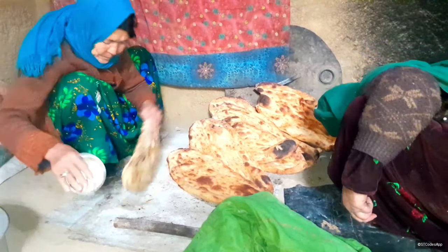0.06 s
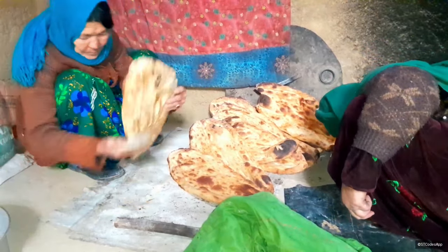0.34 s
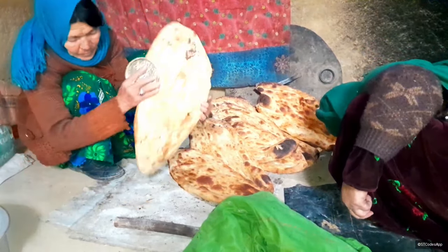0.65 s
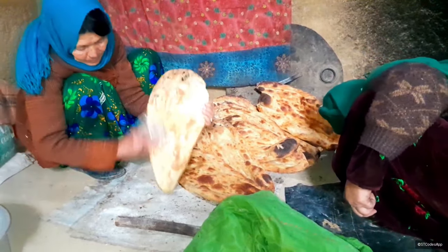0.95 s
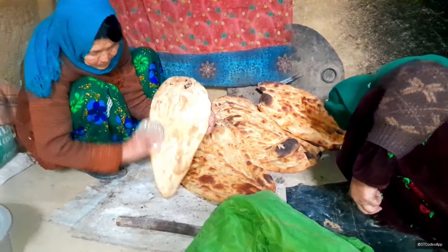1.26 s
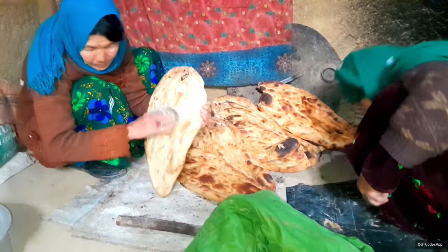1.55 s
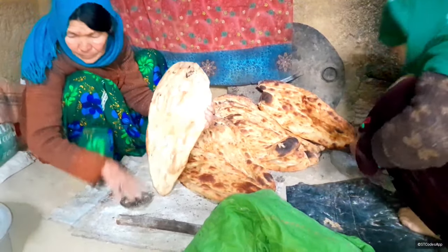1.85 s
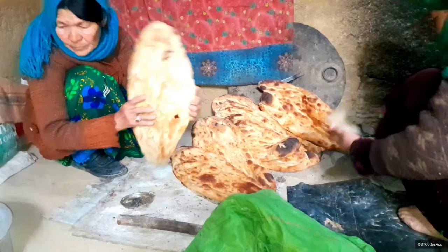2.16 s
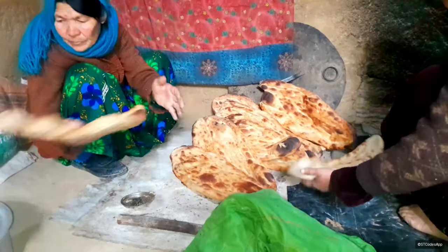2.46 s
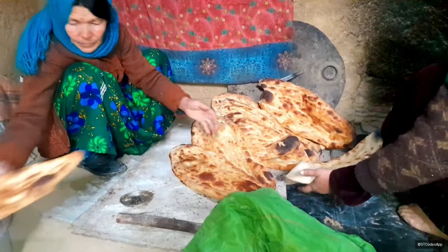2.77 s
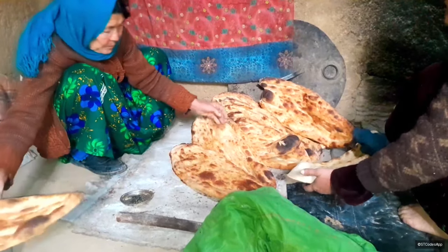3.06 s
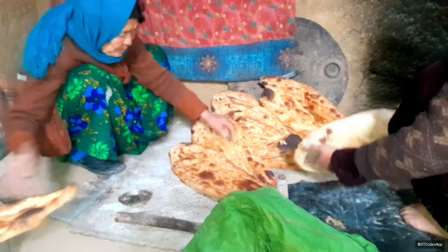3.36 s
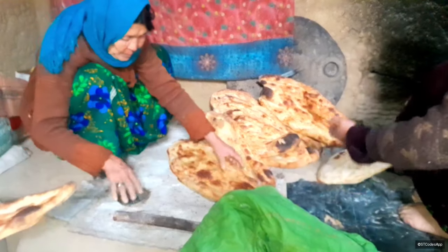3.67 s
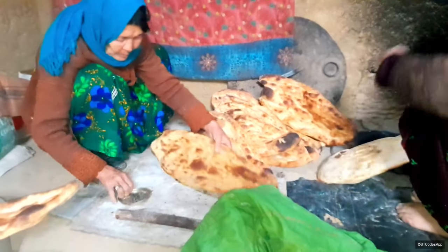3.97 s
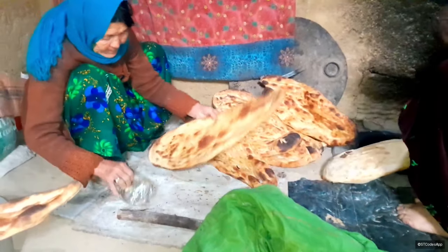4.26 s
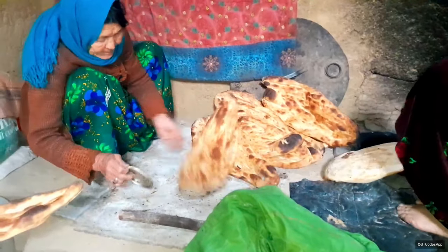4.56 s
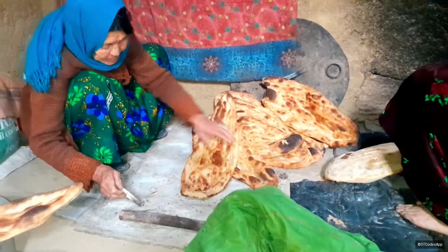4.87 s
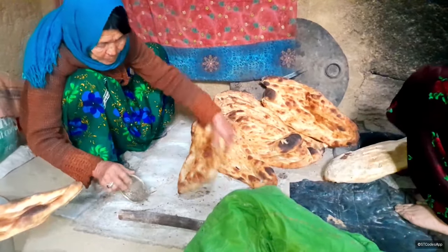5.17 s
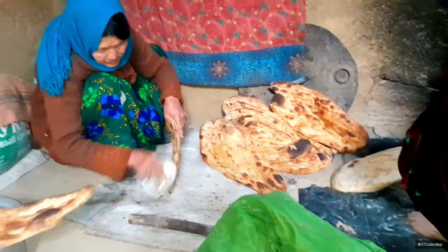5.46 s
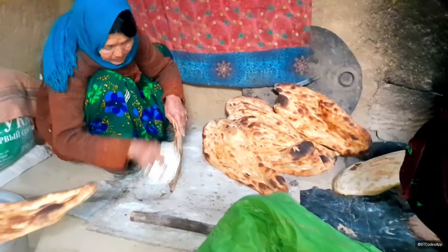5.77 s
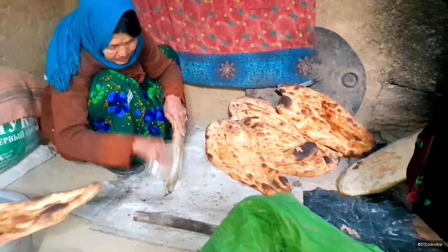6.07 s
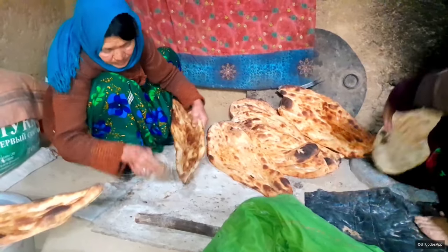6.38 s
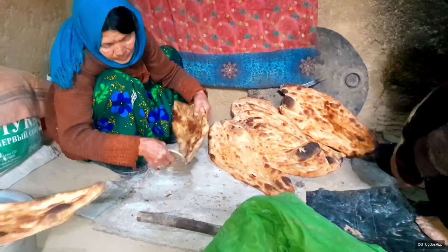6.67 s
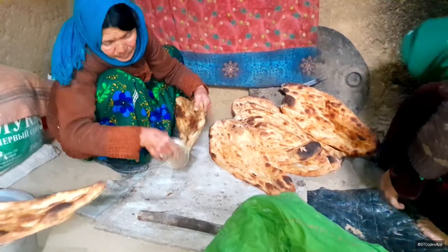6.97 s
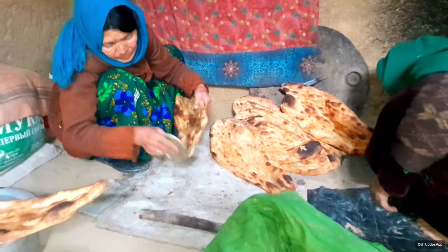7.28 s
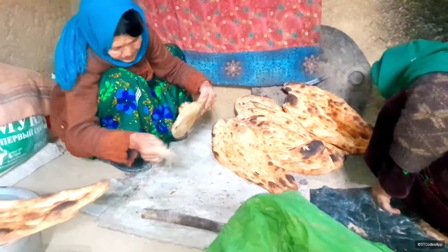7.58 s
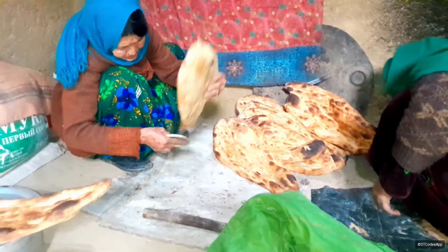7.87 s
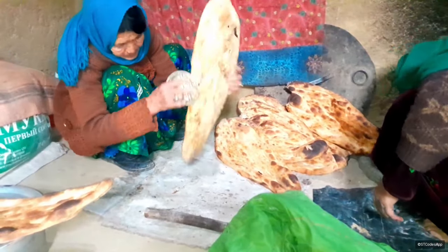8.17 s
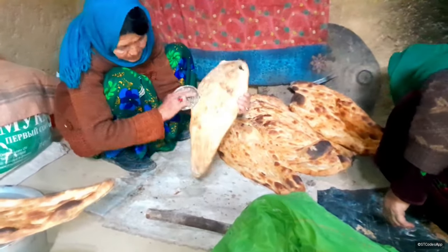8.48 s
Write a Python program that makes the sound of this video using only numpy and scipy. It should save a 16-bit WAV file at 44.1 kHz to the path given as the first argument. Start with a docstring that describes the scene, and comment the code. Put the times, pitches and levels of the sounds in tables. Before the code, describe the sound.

Flatbreads rustle softly on a cloth-covered floor in a small, dead room. A tin lid ticks, then scrapes the hard crust in three gritty sweeps. Loaves are slid and dropped on a pile with dull thuds and crackles, and one is dragged on its edge. Quick, crisp chops of the rim follow, then a flurry of ticks and the start of another scrape, all heard close by.

```python
"""First comes a soft rustle of flatbreads being handled on a cloth-covered floor, in a small dead room.
A small tin lid ticks, then cleans the crust in three long sweeps: tiny fractures hiss, ring the lid and
drum on the loaf. Loaves are lifted, slid and dropped on the pile with dull thuds and crackles.
One is dragged down on its edge, stuttering over the cloth; then come quick chops of the rim,
a flurry of ticks and the start of one more sweep."""
import sys
import numpy as np
from scipy import signal
from scipy.fft import rfft, irfft, next_fast_len
from scipy.io import wavfile
from scipy.ndimage import uniform_filter1d

SR = 44100
rng = np.random.default_rng(int(sys.argv[2]) if len(sys.argv) > 2 else 0)


def transcribe(u):
    """Save the signal u as a 16-bit wav file named by the first command-line argument.

    u: samples, shape (n,) or (channels, n), limited to [-1, 1]; the rate is SR.
    q: integer samples, one column per channel.
    """
    v = np.clip(np.atleast_2d(u).T, -1, 1)
    q = np.round(v * 32767).astype(np.int16)
    wavfile.write(sys.argv[1], SR, q)


N = 380583
TIME = np.arange(N) / SR


def from_db(db):
    """Decibels to gain."""
    return 10 ** (np.asarray(db) / 20)


def unit_energy(response):
    """Scale an impulse response so that it keeps the power of white noise."""
    return response / np.sqrt(np.sum(response ** 2) + 1e-20)


def at_hz(points, hz):
    """Read a curve on a log-frequency axis."""
    f, value = np.transpose(points)
    return np.interp(np.log(np.maximum(hz, 1)), np.log(f), value)


def add(out, start, sound):
    """Mix a short sound in at a time."""
    first = np.searchsorted(TIME, start)
    out[first:first + len(sound)] += sound[:N - first]


def through(force, response):
    """Pass a force through an impulse response."""
    return signal.oaconvolve(force, response)[:N]


def body(colour, low_hz=10, high_hz=20000, size=4096):
    """Minimum-phase impulse response of an EQ curve between a low cut and a high cut."""
    hz = np.maximum(np.fft.rfftfreq(size, 1 / SR), 1)
    cuts = np.sqrt((1 + (low_hz / hz) ** 8) * (1 + (hz / high_hz) ** 8))
    cepstrum = irfft(np.log(from_db(at_hz(colour, hz)) / cuts + 1e-6))
    cepstrum[1:size // 2] *= 2
    cepstrum[size // 2 + 1:] = 0
    return unit_energy(irfft(np.exp(rfft(cepstrum))))


def resonance(hz, width_hz, size=4096):
    """Impulse response of one ringing mode, which radiates nothing at low frequencies."""
    t = TIME[:size]
    ring = np.exp(-np.pi * width_hz * t) * np.sin(2 * np.pi * hz * t)
    return unit_energy(np.diff(ring, prepend=0))


def grains(per_s, spread_db, judder_db, judder_hz, size=N):
    """Crust breaks in tiny uneven fractures, bunched as the contact catches and slips; unit power."""
    sizes = from_db(spread_db * np.minimum(rng.exponential(1, size), 4)) * rng.choice([-1, 1], size)
    catches = np.interp(TIME[:size] * judder_hz, np.arange(size), rng.standard_normal(size))
    fractures = (rng.random(size) < per_s / SR) * sizes * from_db(judder_db * catches)
    return fractures / np.sqrt(np.mean(fractures ** 2) + 1e-20)


def slide_gain(start, length, swell_db, level_db, firm_db=-38.5, firm_attack_s=.007, fall_db_per_s=331):
    """Envelope of a slide: it catches (faster when firm), swells or sags, and runs out."""
    t = TIME - start
    attack = firm_attack_s * np.sqrt(from_db(firm_db - level_db))
    db = swell_db * (np.clip(t / length, 0, 1) - .5) - fall_db_per_s * np.maximum(t - length, 0)
    return np.clip(t / attack, 0, 1) * from_db(np.maximum(db, -200))


def arm_gain(start, rise, swell_db, ease, fall_db_per_s, bend, touch_s=.003):
    """Envelope of an arm movement: touch, speed up, ease over, slow down; bend 1 climbs straight in dB."""
    t = TIME - start
    climb_db = swell_db * np.clip(1 - t / rise, 0, 1) ** bend
    slowing_db = fall_db_per_s * (np.hypot(np.maximum(t - rise, 0), ease) - ease)
    return np.clip(t / touch_s, 0, 1) * from_db(-climb_db - slowing_db)


def pan_track(events):
    """Pan in dB, left over right: each event's last column holds until the next event begins."""
    rows = np.array(events)
    latest = np.maximum(np.searchsorted(rows[:, 0], TIME, side="right") - 1, 0)
    return uniform_filter1d(rows[latest, -1], size=200)


def shade(stereo, pan_curve):
    """Pan by frequency, as the loaf and the hands shade each side differently."""
    size = next_fast_len(N + 1024)
    side_db = at_hz(pan_curve, np.fft.rfftfreq(size, 1 / SR)) * np.array([[.5], [-.5]])
    return irfft(rfft(stereo, size) * from_db(side_db), size)[:, :N]


# Short decay of the dead room: f/Hz, t60/s
ROOM_DECAY = [(100, 0.31), (700, 0.21), (4000, 0.2), (13000, .16)]
# How alike the reverb is left and right: f/Hz, correlation/0-1
ROOM_CORRELATION = [(100, 0.71), (350, 0.96), (900, .25), (2500, 0.65), (12000, .02)]
def room(size=16384, onset_s=0.0013):
    """Stereo response of the room: dense reflections die band by band, most nearly mono in the bass."""
    t, hz, out = TIME[:size], np.fft.rfftfreq(size, 1 / SR), 0
    mid, side = np.exp(2j * np.pi * rng.random((2, len(hz))))
    alike = np.clip(at_hz(ROOM_CORRELATION, hz), 0, 1)
    field = np.sqrt(1 + alike) * mid + np.sqrt(1 - alike) * side * [[1], [-1]]
    edges = np.geomspace(20, SR / 2, 13)
    for low, high in zip(edges, edges[1:]):
        decay = from_db(-60 * t / at_hz(ROOM_DECAY, np.sqrt(low * high)))
        band = irfft(field * ((hz >= low) & (hz < high))) * decay * np.clip(t / onset_s, 0, 1)
        out = out + unit_energy(band) * np.sqrt(4 * (high - low) / SR)
    return out


def place(x, pan_db, lag_ms, wet_db, patterns=3):
    """Direct sound, later on the right, plus reflections that shift as hands and loaves move."""
    direct = np.array([x, np.interp(TIME - lag_ms / 1000, TIME, x)])
    knots = np.arange(0, TIME[-1] + 1, .09)
    sends = np.array([np.interp(TIME, knots, rng.standard_normal(len(knots))) for _ in range(patterns)])
    sends /= np.sqrt(np.sum(sends ** 2, axis=0))
    echoes = sum(signal.oaconvolve([x * send], room(), axes=1)[:, :N] for send in sends)
    wet, sides = from_db(wet_db), from_db(np.array([[.5], [-.5]]) * pan_db)
    return sides * (direct + wet * echoes) / np.sqrt(1 + wet ** 2)


# Warm rustle of sliding bread: f/Hz, level/dB
SLIDE_EQ = [(18, -39), (30, -12), (124, -0.5), (174, -1), (245, -1.5), (486, -10), (702, -8.5),
            (1320, -14.5), (1960, -14), (2290, -13.5), (3770, -16.5), (7270, -26), (9220, -33.5),
            (14800, -19.5), (16000, -27.5)]
# Its stereo spread: f/Hz, pan/dB
SLIDE_SHADE = [(100, -8), (500, -7.5), (1500, -3.5), (4000, -3.5), (6200, 14), (9000, 9.5), (13000, -10.1)]
# Loaves handled: t/s, length/s, crumbs/dB, rub/dB, weight/dB, swell/dB, hollow/Hz, pan/dB
SLIDES = [ (0.0, 0.017, -36.5, -36, -41.5, -18, 1200, 3), (0.04, 0.51, -78.5, -81, -83, -34, 766, 6.5),
          (0.416, 0.12, -47, -53.5, -64, -6.5, 1200, 6.5),
          (0.578, 0.19, -51.5, -53.5, -63, -15.5, 630, 7.5), (0.777, 0.21, -52, -48, -50, 11.5, 1300, 6.5),
          (2.02, 0.16, -60, -54.5, -60, 14, 1200, 8), (2.202, 0.21, -58.5, -49.5, -60, -2, 1200, 8),
          (2.446, 0.03, -55, -52.5, -49, 19, 420, 5), (2.931, 0.09, -44.5, -39.5, -36, -8.5, 720, 5.5),
          (3.021, 0.081, -50, -35.5, -33.5, 0, 696, 6), (3.153, 0.16, -52, -45, -50, -3.5, 700, 7),
          (3.376, 0.13, -58, -54.5, -63, -28, 1130, 2.5), (3.581, 0.17, -49.5, -51, -45, -20.5, 410, 6.5),
          (3.798, 0.13, -56.5, -62, -62.5, 2.5, 1360, 10), (3.97, 0.26, -48, -61, -66, -6.5, 1410, 7.5),
          (4.426, 0.16, -59, -67, -66, 17, 1400, 7.5), (4.575, 0.087, -47, -37.5, -53, -12.5, 1300, 6),
          (4.673, 0.041, -43, -39, -31, -1, 830, 6), (4.77, 0.33, -62.5, -71, -64, -1, 913, 6),
          (5.054, 0.153, -49.5, -46, -55, 1.5, 790, 5.5), (5.197, 0.085, -47.5, -42.5, -49.5, 1, 1300, 4),
          (5.326, 0.2, -51.5, -53.5, -63, 5.5, 1460, 6.5), (6.074, 0.27, -47.5, -62, -58.5, 6.5, 670, 0),
          (6.307, 0.02, -46, -31, -35.5, -7, 428, 4.5), (6.451, 0.22, -67.5, -81, -83, -27, 534, -2.5)]
def loaf_slides(crumb_db=1, rub_db=-1, weight_db=-1, hollow_db=-6, hollow_width_hz=170):
    """Loaves slide on hands and each other: crumbs rustle, the rub rings the hollow below, bread flexes."""
    crumbs = grains(per_s=1900, spread_db=3.5, judder_db=4.0, judder_hz=89.5)
    rub = grains(per_s=3000, spread_db=3.0, judder_db=3, judder_hz=67.73)
    loose, rubbing, weight, hollow = np.zeros((4, N))
    for start, length, loose_db, rubbing_db, heavy_db, swell_db, hollow_hz, _ in SLIDES:
        gain = slide_gain(start, length, swell_db, rubbing_db)
        loose += from_db(loose_db) * gain
        rubbing += from_db(rubbing_db) * gain
        weight += from_db(heavy_db) * gain
        force = (rub * gain)[(TIME >= start) & (TIME < start + .5)]
        add(hollow, start, from_db(rubbing_db) * through(force, resonance(hollow_hz, hollow_width_hz)))
    sound = from_db(crumb_db) * through(crumbs * loose, body(SLIDE_EQ, low_hz=1470))
    sound += from_db(hollow_db) * hollow
    sound += from_db(rub_db) * through(rub * rubbing, body(SLIDE_EQ, low_hz=330, high_hz=1560))
    sound += from_db(weight_db) * through(rub * weight, body(SLIDE_EQ, high_hz=350))
    return shade(place(sound, pan_track(SLIDES), lag_ms=0.14, wet_db=0), SLIDE_SHADE)


# Bed of quiet air: f/Hz, level/dB
AIR_EQ = [(15, -28), (25, -21.5), (175, -5.5), (1290, -13), (2000, -16.5), (5000, -16), (6560, -14),
          (7920, -17), (9320, -15), (16000, -29)]
def room_tone(air_db=-75, rumble_db=-82):
    """Faint steady air of the room over a distant low rumble."""
    air = from_db(air_db) * through(rng.standard_normal(N), body(AIR_EQ))
    rumble = from_db(rumble_db) * through(rng.standard_normal(N), body(AIR_EQ, high_hz=130))
    return place(air + rumble, pan_db=12, lag_ms=0, wet_db=4.0)


# Bright snap of rim on crust, for ticks and chops: f/Hz, level/dB
RIM_EQ = [(29, -50), (50, -26), (244, -12), (303, -17.5), (385, -14), (1050, -16.5), (2060, 6.5),
          (3180, 6.5), (3850, 10.5), (7370, 6.5), (8710, -11.5), (11600, -0.5), (15500, 3)]
# Light touches of the lid: t/s, level/dB, ring/Hz, pan/dB
TICKS = [(0.8904, -33, 3620, 8), (3.997, -29.5, 1980, 12), (4.412, -38, 3410, 7), (4.8294, -38.5, 3040, 28),
         (6.627, -36, 3180, -18), (7.655, -37, 2970, -7), (8.06, -18, 2210, -5), (8.0797, -27.5, 3850, -3),
         (8.1572, -29, 2570, -1), (8.19, -22, 3960, -8), (8.2914, -35, 2020, -14), (8.302, -25, 2050, 3),
         (8.3557, -21.5, 2000, -2), (8.3683, -23, 3770, 0), (8.4585, -33.5, 1550, 5),
         (8.493, -24, 1620, -3)]
def lid_ticks(trim_db=4, ring_db=-2, ring_width_hz=300, chatter_db=-13, chatter_s=0.0025, size=2048):
    """The lid touches the crust: a snap with a brief chatter; where it touches decides which tone rings."""
    out, t, snap = np.zeros(N), TIME[:size], body(RIM_EQ, low_hz=1414)
    for start, db, hz, _ in TICKS:
        chatter = from_db(chatter_db) * np.exp(-t / chatter_s) * rng.standard_normal(size)
        force = from_db(db + trim_db) * ((t == 0) + chatter)
        add(out, start, through(force, snap))
        add(out, start, from_db(ring_db) * through(force, resonance(hz, ring_width_hz)))
    return place(out, pan_track(TICKS), lag_ms=0.064, wet_db=-4.5)


# Choked modes of the tin lid: f/Hz, width/Hz, level/dB
LID_MODES = [(2130, 300, -14), (2820, 420, -5), (3480, 520, 0), (3950, 480, 0), (6640, 400, -12)]
def gripped_lid(pitch=1):
    """Impulse response of the lid: a few modes, damped and detuned by the grip of the fingers."""
    return unit_energy(sum((-1) ** k * from_db(db) * resonance(hz * pitch, width)
                           for k, (hz, width, db) in enumerate(LID_MODES)))


# Rasp and body of the scraped loaf: f/Hz, level/dB
SWEEP_EQ = [(29, -26), (50, -13), (371, -1), (472, -6.5), (545, 1), (905, -6.5), (2060, 1), (3100, -2),
            (3410, 2.5), (4560, -8), (6870, -10.5), (9870, -19.5), (12300, -9.5), (14900, -8), (16000, -31)]
# Shading by the upright loaf and the hands: f/Hz, pan/dB
SWEEP_SHADE = [(200, 6), (900, 7), (2000, 0.5), (3500, -4), (5500, 9.5), (8000, 17.5), (12000, -5.5)]
# Long scrapes: t/s, rise/s, swell/dB, ease/s, fall/(dB/s), grit/dB, drum/dB, weight/dB, pan/dB
SWEEPS = [ (0.935, 0.13, 21, 0.0047, 602, -16, -25.5, -38, 5),
          (1.306, 0.079, 10, 0.045, 519.5, -17.5, -25.5, -33.5, 3),
          (1.656, 0.069, 22.5, 0.14, 448.5, -16, -25, -30, 3.5),
          (8.536, 0.093, 36.5, .060, 412, -20, -25.5, -52, -9)]
def lid_sweeps(grit_db=2, weight_db=-1, ring_db=-18, bend=1.47, loaf_lag_s=0.024, loaf_follows=0.74):
    """The rim grinds along the crust; the fractures hiss, ring the lid and drum on the loaf."""
    grit, drum, weight = np.zeros((3, N))
    for start, rise, swell_db, ease, fall, crust_db, drum_db, heavy_db, _ in SWEEPS:
        grit += from_db(crust_db) * arm_gain(start, rise, swell_db, ease, fall, bend)
        # the loaf peaks later than the rim and swings less
        follow = arm_gain(start, rise + loaf_lag_s, swell_db, ease, fall, bend) ** loaf_follows
        drum += from_db(drum_db) * follow
        weight += from_db(heavy_db) * follow
    fractures = grains(per_s=12000, spread_db=2.5, judder_db=2.0, judder_hz=217.6)
    bite = fractures * grit
    crust = from_db(grit_db) * through(bite, body(SWEEP_EQ, low_hz=1200))
    ring = from_db(ring_db) * through(bite * rng.standard_normal(N), gripped_lid())
    loaf = through(fractures * drum, body(SWEEP_EQ, low_hz=320, high_hz=1300))
    loaf += from_db(weight_db) * through(fractures * weight, body(SWEEP_EQ, high_hz=300))
    pan_db = pan_track(SWEEPS)
    sound = place(crust + ring, pan_db, lag_ms=0.17, wet_db=-3)
    sound += place(loaf, .35 * pan_db - 7, lag_ms=0.26, wet_db=-8.5)
    return shade(sound, SWEEP_SHADE)


# Flexing modes of a whole loaf: f/Hz, level/dB
LOAF_MODES = [(80, -2), (133, 5), (252, 0), (352, -12)]
# Dull low thud: f/Hz, level/dB
THUD_EQ = [(18, -54.5), (30, -28), (108, -6.5), (140, 0.5), (256, -4), (301, -20), (479, -13.5), (600, -5),
           (780, -49.5), (1320, -120)]
# Dry crunch of crust, for bumps and cracks: f/Hz, level/dB
CRUNCH_EQ = [(180, -21.5), (300, -6), (689, 2), (978, -6.5), (1930, 1), (2320, -3.5), (4160, -13),
             (4750, -22), (6850, -15), (8940, -33.5), (15000, -15.5), (16000, -31.5)]
# Stereo spread of bumps and cracks: f/Hz, pan/dB
CRUNCH_SHADE = [(300, -0.5), (2500, -1.5), (6000, 7.5), (9000, 9.5), (13000, 0)]
# Soft hits on a loaf: t/s, thud/dB, crunch/dB, t60/s, pan/dB
BUMPS = [ (0.938, -57, -43, 0.052, -6), (1.046, -16, -20.5, 0.26, -2), (1.828, -18.5, -32, 0.06, -2),
         (2.061, -45, -53, 0.16, 1), (2.217, -37.5, -44, 0.33, -2), (2.477, -44, -28.5, 0.036, 10.5),
         (2.682, -52.5, -51, 0.18, -1), (2.938, -37, -34, 0.084, 4), (3.024, -46, -18, 0.14, 4),
         (3.056, -31.5, -22.5, 0.16, 1.5), (3.187, -37, -45, 0.36, 0), (3.279, -42, -40, 0.2, 1.5),
         (3.599, -37.5, -28, 0.039, 0), (4.58, -52, -38.5, 0.36, 4), (4.679, -29, -38, 0.13, 2),
         (5.011, -34, -52, 0.026, -19), (5.224, -58, -35, 0.14, 12), (5.7, -32, -12, 0.095, 4),
         (5.719, -28, -24, 0.068, 10), (6.31, -30, -14, 0.056, 6.5)]
def loaf_bumps(attack_s=0.0029, flex_db=-4, rumple_db=-4):
    """A loaf is knocked or lands: it flexes with a dull thud, and crunches as its crust settles."""
    thud, crunch, flex = np.zeros((3, N))
    t = TIME[:SR // 2]
    for start, thud_db, crunch_db, t60, _ in BUMPS:
        settle = np.minimum(t / attack_s, 1) * from_db(-60 * t / t60)
        loaf_size = 1 + .05 * rng.standard_normal()
        modes = sum(from_db(db) * np.sin(2 * np.pi * hz / loaf_size * t) for hz, db in LOAF_MODES)
        add(flex, start, from_db(thud_db + flex_db) * settle * modes)
        add(thud, start, from_db(thud_db + rumple_db) * settle)
        add(crunch, start, from_db(crunch_db) * settle)
    contacts = grains(per_s=5100, spread_db=4, judder_db=5.5, judder_hz=287.5)
    sound = flex + through(contacts * thud, body(THUD_EQ, high_hz=483))
    sound += through(contacts * crunch, body(CRUNCH_EQ, low_hz=360))
    return shade(place(sound, pan_track(BUMPS), lag_ms=0.27, wet_db=-7.0), CRUNCH_SHADE)


# Thin, papery scratch: f/Hz, level/dB
GRAZE_EQ = [(120, -29.5), (200, -16.5), (601, -10), (1250, -12), (1870, -3.5), (2330, -4.5), (3760, 2),
            (6880, -14), (8900, -25.5), (14100, -9), (16000, -14)]
# Light brushes of the lid: t/s, length/s, level/dB, swell/dB, pan/dB
GRAZES = [(1.163, 0.089, -57, -5.5, 4.5), (5.895, .09, -47, -2.5, -8), (6.928, .012, -61, -2.5, -6),
          (7.94, 0.075, -69.5, 2, -19), (8.051, 0.26, -50, -3, -6.5), (8.329, 0.23, -46.5, -14, -7.5)]
def lid_grazes(trim_db=1):
    """The rim brushes cloth and crust with hardly any pressure: a thin, uneven scratching."""
    gain = sum(from_db(db) * slide_gain(start, length, swell_db, db)
               for start, length, db, swell_db, _ in GRAZES)
    scratches = grains(per_s=1200, spread_db=0.5, judder_db=4.5, judder_hz=86.35) * gain
    sound = from_db(trim_db) * through(scratches, body(GRAZE_EQ, low_hz=149))
    return place(sound, pan_track(GRAZES), lag_ms=0.11, wet_db=-10)


# Hard crust snapping under load: t/s, level/dB, pan/dB
CRACKS = [(1.329, -21, 0.5), (1.654, -32, 5.5), (1.676, -21.5, 5), (2.682, -49.5, -3.5), (2.939, -38, 1),
          (3.027, -25.5, -10), (3.279, -32, -1), (3.601, -34, 11), (3.735, -43, 4), (4.683, -27, 8),
          (5.702, -18.5, -3.5), (5.792, -20.5, -22.5), (5.817, -28.5, -24.5), (5.886, -31, -14),
          (6.3085, -16, -5)]
def crust_cracks(length_s=0.0039, release_s=0.00033, size=1024):
    """A blister of crust gives way: a few milliseconds of dense fractures that knock on the loaf."""
    out, crust = np.zeros(N), body(CRUNCH_EQ, low_hz=287)
    force = np.exp(-np.maximum(TIME[:size] - length_s, 0) / release_s)
    for start, db, _ in CRACKS:
        add(out, start, from_db(db) * through(force * rng.choice([-1, 1], size), crust))
    return shade(place(out, pan_track(CRACKS), lag_ms=0.13, wet_db=-6.5), CRUNCH_SHADE)


# Faint tail of the lid ringing on between the fingers: f/Hz, width/Hz, level/dB
LID_TAIL = [(2084, 10, -21.5), (3970, 22, -16)]
# Rim strokes: t/s, rise/s, contact/s, grit/dB, fade/dB, loaf/dB, ring/dB, crispness/dB, pan/dB
CHOPS = [ (4.376, 0.0092, 0.039, -57, 0.5, -64, 1, -4.5, 10.5),
         (5.672, 0.0034, 0.0044, -8, 10.5, -49, -21.5, 4, 22),
         (5.993, 0.0036, 0.016, -7.5, 7, -21, -20.5, 1, -9),
         (6.019, 0.0058, 0.054, -9, 22.5, -24, -11.5, 0.5, -4),
         (6.274, .006, 0.0074, -22, -1, -24, -3, 2, -6.5),
         (6.313, 0.0019, 0.045, -27, 6, -55, -18, 8.5, -9),
         (6.678, 0.0058, 0.042, -7.5, 22.5, -25.5, -6.5, 5, -5.5),
         (6.963, 0.0042, 0.03, -14, 8.5, -30, 0.5, 2.5, -7.5),
         (7.232, 0.0088, 0.023, -11.5, 6.5, -33, -5, 0, -6.5),
         (7.501, 0.005, 0.063, -14, 22.5, -30, -13, -1, -5.5),
         (7.751, 0.012, 0.078, -15.5, 5, -31.5, -22, 1.5, -7)]
def lid_chops(release_s=0.01, loaf_lag_s=0.0089, crisp_above_hz=8000, size=8192):
    """The rim bites at once, skids, and leaves the crust; the loaf answers a moment later."""
    crust, loaf = np.zeros((2, N))
    t, flex = TIME[:size], body(RIM_EQ, low_hz=92.3, high_hz=1140)
    tail = sum(from_db(db) * resonance(hz, width) for hz, width, db in LID_TAIL)
    for start, rise, contact, grit_db, fade_db, loaf_db, ring_db, crisp_db, _ in CHOPS:
        release = np.exp(-np.maximum(t - contact, 0) / release_s)
        force = np.minimum(t / rise, 1) * from_db(-fade_db * t / contact) * release
        fractures = force * grains(per_s=16000, spread_db=7.0, judder_db=4.05, judder_hz=420, size=size)
        crisp_eq = [(hz, db + crisp_db * (hz > crisp_above_hz)) for hz, db in RIM_EQ]
        grit = through(fractures, body(crisp_eq, low_hz=940))
        tin = from_db(ring_db) * gripped_lid(pitch=rng.uniform(.98, 1.04))
        ring = through(force * rng.standard_normal(size), tin + tail)   # the skid shakes the lid itself
        add(crust, start, from_db(grit_db) * (grit + ring))
        add(loaf, start + loaf_lag_s, from_db(loaf_db) * through(fractures, flex))
    sound = place(crust, pan_track(CHOPS), lag_ms=0.0877, wet_db=-7)
    return sound + place(loaf, pan_db=0, lag_ms=.03, wet_db=3.0)


# Stereo spread of the chops: f/Hz, pan/dB
CHOP_SHADE = [(200, -2), (900, 0), (2000, 0.3), (3800, -3.5), (6500, -0.2), (12000, -2.8)]
def shaded_chops():
    """The chops lean slightly to the right in the bass and in parts of the treble."""
    return shade(lid_chops(), CHOP_SHADE)


# Heavy scuff of bread on cloth: f/Hz, level/dB
DRAG_EQ = [(18, -34.5), (30, -14), (93, 2.5), (204, -1.5), (355, 0.5), (449, -8), (554, -8), (913, -11.5),
           (1070, -5), (4080, -4.5), (7470, -22.5), (8980, -25.5), (14800, -22), (16000, -35)]
# Its stereo spread: f/Hz, pan/dB
DRAG_SHADE = [(60, -11), (110, -19), (200, -11), (380, -18.5), (700, -24.5), (1290, -4), (2380, -3),
              (4400, 2.5), (8120, -7.5), (15000, -18)]
# The loaf ends up upright and shadows the left side: t/s, length/s, level/dB
DRAG_SHADOW = (5.755, .04, -10)
# One pull of the arm: t/s, rise/s, swell/dB, ease/s, fall/(dB/s)
DRAG = (5.532, 0.16, 36.2, 0.11, 167)
def loaf_drag(grit_db=-23, loaf_db=-24, fine_db=-32, fine_follows=1.6):
    """A loaf's edge stutters over the cloth, coarse and heavy; fine grit hisses mostly at full speed."""
    speed = arm_gain(*DRAG, bend=1.3)
    slips = grains(per_s=2500, spread_db=5, judder_db=4.5, judder_hz=154.5)
    crust = from_db(grit_db) * through(slips * speed, body(DRAG_EQ, low_hz=1200, high_hz=5440))
    fine = from_db(fine_db) * through(slips * speed ** fine_follows, body(DRAG_EQ, low_hz=5500))
    loaf = from_db(loaf_db) * through(slips * speed, body(DRAG_EQ, high_hz=1240))
    sound = place(crust, pan_db=-8.5, lag_ms=.15, wet_db=1.5)
    sound += place(fine, pan_db=-10, lag_ms=0.16, wet_db=4.5)
    sound += place(loaf, pan_db=-7, lag_ms=0.29, wet_db=-12.5)
    start, length, shadow_db = DRAG_SHADOW
    left_gain = from_db(shadow_db * np.clip((TIME - start) / length, 0, 1))
    return shade(sound, DRAG_SHADE) * [left_gain, np.ones(N)]


def scene():
    """All the work on the bread, over the quiet of the room."""
    return (loaf_slides() + room_tone() + lid_ticks() + lid_sweeps() + loaf_bumps()
            + lid_grazes() + crust_cracks() + shaded_chops() + loaf_drag())


def record(dry, dip_hz=9000, dip_width_hz=1500, dip_db=-6, cutoff_hz=15500):
    """The microphone has a hollow in the treble; stray peaks are rounded and the top is cut steeply."""
    notched = signal.lfilter(*signal.iirnotch(dip_hz, dip_hz / dip_width_hz, fs=SR), dry)
    coloured = notched + from_db(dip_db) * (dry - notched)
    rounded = .9 * np.tanh(coloured / .9)
    return signal.sosfilt(signal.ellip(10, .3, 80, cutoff_hz, fs=SR, output="sos"), rounded)


dry = scene()
out = record(dry)
transcribe(out)
```